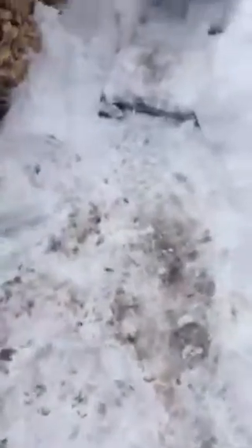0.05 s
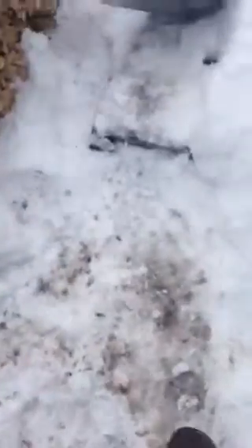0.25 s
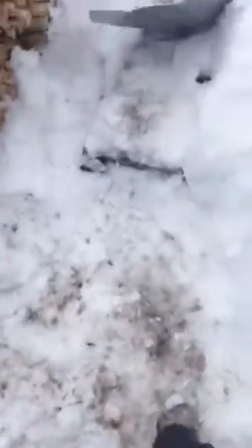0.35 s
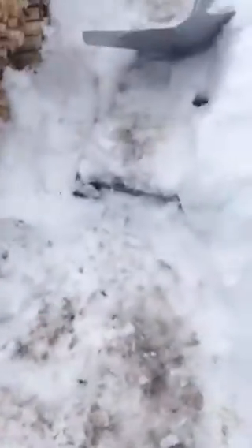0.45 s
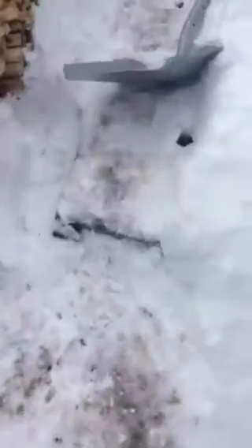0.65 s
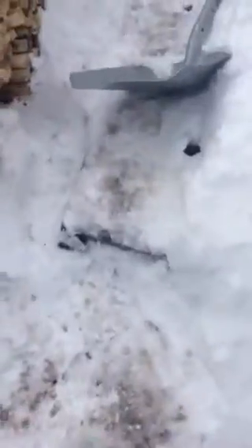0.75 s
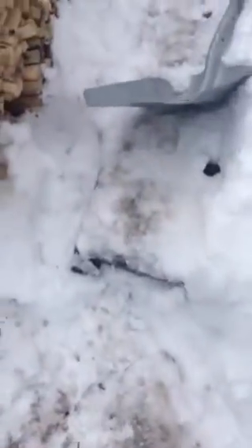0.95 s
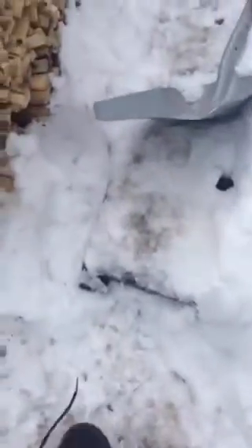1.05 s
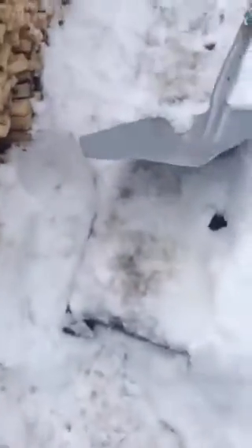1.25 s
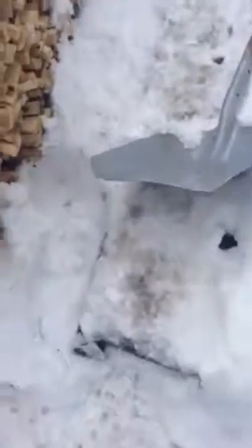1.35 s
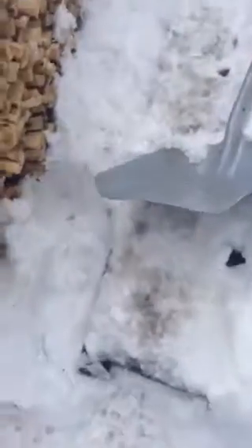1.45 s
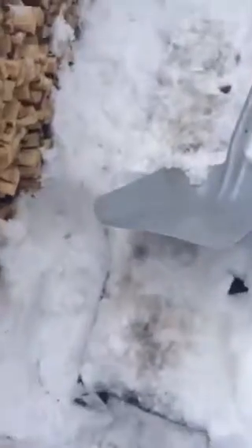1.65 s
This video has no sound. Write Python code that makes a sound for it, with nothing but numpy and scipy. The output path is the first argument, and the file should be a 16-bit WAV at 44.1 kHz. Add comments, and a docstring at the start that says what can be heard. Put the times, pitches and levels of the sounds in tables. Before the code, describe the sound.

Two slow footsteps crunch on packed snow, each with a soft thud. After the second, an icy crust snaps and something small rattles briefly. The outdoor air is quiet, with low rumble from the close hand-held microphone.

```python
"""Two slow steps on packed snow, outdoors in quiet air, close to a hand-held microphone.
Clothing brushes, then the first heel lands with a thud and a crunch at 0.4 s; the sole rolls on
and the snow gives way in small slips. The second heel lands at 1.1 s, the snow groans under the
full weight and a crust of ice snaps. Last, near 1.5 s, something small and hard on the clothing,
perhaps a zip pull, rattles. Low handling rumble swells with each step."""
import sys
import numpy as np
from scipy import signal
from scipy.io import wavfile

SR = 44100
rng = np.random.default_rng(int(sys.argv[2]) if len(sys.argv) > 2 else 0)


def bounce(signal):
    """Save signal as a 16-bit WAV file at the path given by the first command-line argument."""
    frames = np.transpose(np.atleast_2d(signal))
    limited = np.clip(frames, -1, 1)
    pcm = np.round(limited * 32767).astype(np.int16)
    wavfile.write(sys.argv[1], SR, pcm)


N = 74970
T = np.arange(N) / SR

# Snow crushed under the boot: (start [s], rise [s], hold [s], 20 dB fall [s], level [dB],
# extra body [dB], extra treble [dB], hollow resonance [Hz])
SNOW_CRUNCHES = [ (.376, 0.0038, 0.0064, 0.0411, -60, 3, 1, 900),
                 (.383, .014, .006, .028, -36, 1.5, -.5, 900), (.412, 0.0104, .036, 0.04, -48, -2, -5, 900),
                 (.459, .010, .010, .016, -47, -3, -6, 900), (.510, .009, .011, .016, -46, 4.5, -7, 900),
                 (.557, .005, 0.01, .022, -57.5, 6.5, -4, 520),
                 (0.586, 0.0028, 0.0079, .030, -55, 4, -4, 650),
                 (0.623, 0.00815, .007, .080, -55, 0, -1, 1900),
                 (1.085, .015, 0.00487, .034, -38.5, -3, 6, 630),
                 (1.112, .016, .036, .040, -44, 5.5, 3.5, 620),
                 (1.223, 0.0037, 0.0063, .036, -60, 1, 0, 700), (1.340, .008, .006, .034, -62, 1, 0, 700),
                 (1.381, .006, .010, .016, -62, 3, 1, 330), (1.396, .009, .007, .032, -51, -4, -1, 1550),
                 (1.418, 0.00593, 0.0233, .028, -57, 1, 3, 1900)]
# Tone of the crushed snow: (frequency [Hz], level [dB])
SNOW_SPECTRUM = [(30, -31), (100, -11), (195, -10), (265, 4), (340, 1), (480, -3), (630, -1), (800, -3),
                 (1050, -2), (1500, -8.5), (2200, -10.5), (3500, -15.5), (5500, -20), (9000, -27),
                 (15000, -38.5)]
# Thuds of the boots and the walker's weight: (time [s], pitch [Hz], level [dB])
BOOT_THUDS = [(.2365, 76, -38.5), (.2778, 100, -33.5), (.3998, 108, -24.5), (.521, 120, -40),
              (.5525, 86, -35.5), (.703, 85, -52), (1.1022, 92, -32), (1.4238, 96, -43)]
# The packed layer gives way with a hollow knock: (time [s], pitch [Hz], level [dB], t60 [s])
SLIP_KNOCKS = [(0.386, 380, -25, 0.0246), (0.3933, 330, -27.5, .026), (.3975, 900, -36, .12),
               (0.5213, 274.2, -31, .05), (0.5604, 403, -38, 0.032), (.5888, 487, -37, 0.0263),
               (1.1022, 627, -29, .035), (1.3825, 294.2, -42, .05)]
# Snow sticks and slips under full weight: (start [s], rise [s], hold [s], 20 dB fall [s], level [dB])
GROAN_STROKE = (1.130, .010, .026, .034, -44)
# A crust of ice snaps: (time [s], peak [dB])
CRUST_SNAPS = [(1.3025, -33.5), (1.3058, -43)]
# Tone of the snapping crust: (frequency [Hz], level [dB])
SNAP_SPECTRUM = [(40, -50), (120, -32), (220, -12), (330, 1.5), (450, -5.5), (640, 1.5), (950, 1.5),
                 (1600, -5.5), (2400, -24), (5000, -34.5), (15000, -52.5)]
# Single brittle crystals break: (time [s], peak [dB], band centre [Hz])
CRYSTAL_CRACKS = [(.121, -59, 3400), (.1615, -52, 1400), (.3891, -32, 2000), (0.4891, -52, 3000),
                  (.5940, -46.5, 4200), (.661, -57, 5000), (1.046, -54, 5000), (1.2485, -49, 6200),
                  (1.483, -49, 2300)]
# Hits of the small hard object on the clothing: (time [s], level [dB])
RATTLE_CLINKS = [(1.4828, -43), (1.4954, -48), (1.5067, -48), (1.5116, -43), (1.5393, -47), (1.5438, -52),
                 (1.556, -59), (1.565, -58)]
# Its ringing modes: (frequency [Hz], level [dB], t60 [s])
RATTLE_MODES = [(2340, -11, .016), (4885, -6, 0.023), (5516, 1, 0.029), (5890, -1, 0.0334),
                (6217, -5, 0.029), (7970, -5, .04), (8990, -5, .035), (9540, -9, .03), (12140, -12, .02)]
# Tone of its contact tick: (frequency [Hz], level [dB])
TICK_SPECTRUM = [(200, -25.5), (1500, -10.5), (4000, -7.5), (6000, 1.5), (10000, -1.5), (15000, -6)]
# Clothing brushes: (start [s], rise [s], hold [s], 20 dB fall [s], level [dB])
CLOTH_BRUSHES = [(.116, 0.0047, .006, 0.01, -72), (.142, 0.0121, .012, 0.0542, -70),
                 (.645, .012, 0.0081, 0.03, -68), (1.043, 0.0021, 0.0178, .04, -66.5),
                 (1.19, 0.0404, 0.0465, 0.18, -67), (1.481, 0.00336, .028, 0.0265, -65)]
# Tone of the rubbing fabric: (frequency [Hz], level [dB])
CLOTH_SPECTRUM = [(100, -10.5), (700, 0), (1700, -1), (3000, -6), (5500, -5), (9000, -7), (15000, -14)]
# Swell of the handling rumble at the microphone: (time [s], level [dB])
RUMBLE_CURVE = [(0, -64), (.18, -68), (.22, -56.5), (.31, -55), (.37, -62), (.42, -46.5), (.50, -48),
                (.57, -53), (.61, -63), (.76, -77), (1.0, -80), (1.035, -66), (1.075, -74), (1.12, -48),
                (1.21, -63), (1.28, -72), (1.38, -66), (1.435, -55), (1.47, -64), (1.56, -73), (1.7, -78)]
# Tone of that rumble: (frequency [Hz], level [dB])
RUMBLE_SPECTRUM = [(15, -50), (28, -30), (40, -10), (55, 3), (85, -2), (135, -9), (195, -14), (300, -32),
                   (500, -45.5), (2000, -78)]
# Tone of the open air: (frequency [Hz], level [dB])
AIR_SPECTRUM = [(25, -16), (70, -2), (170, -1), (260, 0), (400, -1), (700, -2.5), (1100, -4), (1600, -9),
                (2500, -17.5), (3600, -18.5), (5000, -18), (7000, -21.5), (9500, -18), (12000, -25),
                (15000, -30)]
# Swell of the faint high hiss: (time [s], level [dB])
HISS_CURVE = [(0, -86), (.33, -94), (.7, -83), (1.0, -79), (1.4, -78), (1.7, -90)]
# Tone of that hiss: (frequency [Hz], level [dB])
HISS_SPECTRUM = [(500, -22), (2500, -5), (5000, 0.5), (7000, -2), (9500, 2), (15000, -5)]

BODY_HZ, TREBLE_HZ = 565, 3060  # shelf corners
CLUMP_DB, HOLLOW_DB, HOLLOW_WIDTH_HZ = 1.4, 7, 36
THUD_RISE_CYCLES, KNOCK_RISE_S = .55, .000406
GROAN_HZ, GROAN_SAG_HZ_PER_S, GROAN_JITTER, GROAN_DB_PER_OCTAVE = 325, 1200, .09, -9
CRACK_WIDTH_OCTAVES = 1.4
TICK_GAIN_DB, RING_GAIN_DB = -10, -13
AIR_DB, BAND_LIMIT_HZ = -70, 15480


def crunches():
    """Clumps of snow grains break under the sole, muffled by the boot and the snow around."""
    out = np.zeros(N)
    for start, rise, hold, fall, db, body_db, treble_db, hollow_hz in SNOW_CRUNCHES:
        breaking = grains(per_s=6500, spread_db=2.4, hiss_db=-4)
        clumps = unit(breaking * amp(CLUMP_DB * drift(step_s=.003)))
        crunch = colour(clumps * stroke(start, rise, hold, fall), SNOW_SPECTRUM, body_db, treble_db)
        out += amp(db) * hollow(crunch, hollow_hz)
    return out


def hollow(crunch, hz):
    """The pocket under the sole lifts one narrow band."""
    b, a = signal.iirpeak(hz, hz / HOLLOW_WIDTH_HZ, SR)
    return crunch + (amp(HOLLOW_DB) - 1) * signal.lfilter(b, a, crunch)


def thuds():
    """The walker's weight comes down in soft, heavily damped pushes."""
    out = np.zeros(N)
    for start, hz, db in BOOT_THUDS:
        cycles = hz * T[:SR // 8]
        progress = cycles / THUD_RISE_CYCLES
        push = (progress * np.exp(1 - progress)) ** 2
        add(out, start, -amp(db) * push * np.sin(2 * np.pi * cycles))
    return out


def knocks():
    """Each slip of the packed layer rings the sole briefly."""
    out, t = np.zeros(N), T[:SR // 8]
    attack = 1 - np.exp(-t / KNOCK_RISE_S)
    for start, hz, db, t60 in SLIP_KNOCKS:
        add(out, start, -amp(db) * attack * decay(t, t60) * np.sin(2 * np.pi * hz * t))
    return out


def groan():
    """Quick, uneven slips fuse into a short groan that sinks as the snow packs."""
    start, rise, hold, fall, db = GROAN_STROKE
    sag_hz = GROAN_SAG_HZ_PER_S * np.clip(T - start, 0, rise + hold + fall)
    hz = (GROAN_HZ - sag_hz) * (1 + GROAN_JITTER * drift(step_s=.004))
    phase = 2 * np.pi * np.cumsum(hz) / SR
    slips = sum(amp(GROAN_DB_PER_OCTAVE * np.log2(k)) * np.sin(k * phase) for k in range(1, 6))
    flutter = amp(2.5 * drift(step_s=.005))
    return amp(db) * stroke(start, rise, hold, fall) * unit(slips * flutter)


def ice():
    """The crust breaks with dull snaps, single crystals with bright cracks."""
    out, snap = np.zeros(N), response(SNAP_SPECTRUM)
    for start, db in CRUST_SNAPS:
        add(out, start, amp(db) * snap / abs(snap).max())
    for start, db, hz in CRYSTAL_CRACKS:
        band_hz = hz * 2 ** (CRACK_WIDTH_OCTAVES * np.array([-.5, .5]))
        crack = signal.lfilter(*signal.butter(2, band_hz, "band", fs=SR), burst(t60=.014))
        add(out, start, amp(db) * crack / abs(crack).max())
    return out


def rattle():
    """A small hard object on the clothing clinks: each hit is a bright tick and a short high ring."""
    out = np.zeros(N)
    for start, db in RATTLE_CLINKS:
        tick = colour(burst(t60=.026), TICK_SPECTRUM)
        t = T[:len(tick)]
        ring = sum(amp(mode_db) * decay(t, t60) * np.sin(2 * np.pi * (hz * t + rng.random()))
                   for hz, mode_db, t60 in RATTLE_MODES)
        add(out, start, amp(db) * (amp(TICK_GAIN_DB) * tick + amp(RING_GAIN_DB) * ring))
    return out


def clothing():
    """Fabric rubs in short, faint, grainy strokes."""
    pressure = sum(amp(db) * stroke(*timing) for *timing, db in CLOTH_BRUSHES)
    return colour(pressure * grains(per_s=1500, spread_db=4.5, hiss_db=-3.5), CLOTH_SPECTRUM)


def background():
    """Quiet outdoor air, a faint high hiss and handling rumble on the carried microphone."""
    air = noise(AIR_SPECTRUM)
    hiss = noise(HISS_SPECTRUM) * level(HISS_CURVE)
    rumble = noise(RUMBLE_SPECTRUM) * level(RUMBLE_CURVE)
    return air * amp(AIR_DB + .5 * drift(step_s=.0822)) + hiss + rumble


def amp(db):
    """Decibels to gain."""
    return 10 ** (np.asarray(db) / 20)


def unit(x):
    """Scales to rms 1."""
    return x / np.sqrt(np.mean(x ** 2) + 1e-20)


def add(mix, start, sound):
    """Mixes a sound in at a time in seconds."""
    part = mix[max(round(start * SR), 0):][:len(sound)]
    part += sound[:len(part)]


def response(spectrum, body_db=0, treble_db=0, size=4096):
    """Causal impulse response of a spectrum, of energy 1 before its body and treble shelves."""
    hz = abs(np.fft.fftfreq(size, 1 / SR))
    points_hz, points_db = np.transpose(spectrum)
    curve_db = np.interp(np.log(hz + 1), np.log(points_hz), points_db)
    shelves_db = body_db / (1 + (hz / BODY_HZ) ** 4) + treble_db * (1 - 1 / (1 + (hz / TREBLE_HZ) ** 3))
    gain = unit(amp(curve_db)) * amp(shelves_db)
    return np.fft.ifft(np.exp(np.conj(signal.hilbert(np.log(gain))))).real  # minimum phase


def colour(x, spectrum, body_db=0, treble_db=0):
    """Filters a sound through a spectrum."""
    return signal.fftconvolve(x, response(spectrum, body_db, treble_db))[:len(x)]


def noise(spectrum):
    """Steady coloured noise of rms 1."""
    return unit(colour(rng.standard_normal(N), spectrum))


def level(curve):
    """Gain that follows a curve of decibels in time."""
    return amp(np.interp(T, *np.transpose(curve)))


def stroke(start, rise, hold, fall):
    """Pressure that rises, holds, then loses 20 dB every `fall` seconds."""
    t = T - start
    return np.clip(t / rise, 0, 1) ** 2 * amp(-20 * np.maximum(t - rise - hold, 0) / fall)


def decay(t, t60):
    """Gain that loses 60 dB in t60 seconds."""
    return amp(-60 * t / t60)


def drift(step_s):
    """Glides to a new random value at each step."""
    return np.interp(T / step_s, np.arange(N), rng.standard_normal(N))


def grains(per_s, spread_db, hiss_db):
    """Clicks of unequal size over a bed of fine hiss."""
    size = amp(spread_db * np.minimum(rng.exponential(1, N), 4))
    clicks = size * rng.choice([-1, 1], N) * (rng.random(N) < per_s / SR)
    return unit(unit(clicks) + amp(hiss_db) * rng.standard_normal(N))


def burst(t60, size=4096):
    """A short dying puff of noise."""
    return rng.standard_normal(size) * decay(T[:size], t60)


def scene():
    """Everything reaches one microphone, with no echo from the snow; both channels are alike."""
    mono = crunches() + thuds() + knocks() + ice() + clothing() + rattle() + background() + groan()
    return np.array([mono, mono])


def record(dry):
    """The recorder's band limit cuts the highest treble."""
    lowpass = signal.firwin(511, BAND_LIMIT_HZ, window=("kaiser", 8), fs=SR)
    return signal.oaconvolve(dry, lowpass[None], "same")


dry = scene()
out = record(dry)
bounce(out)
```